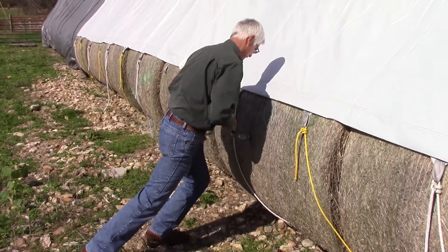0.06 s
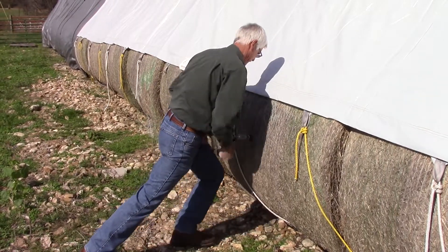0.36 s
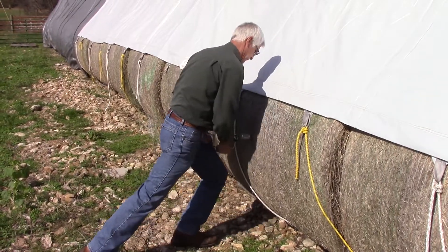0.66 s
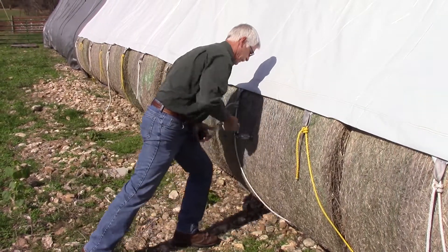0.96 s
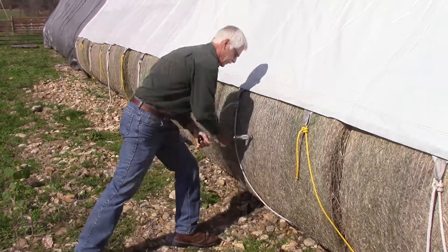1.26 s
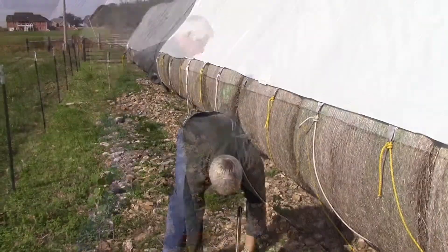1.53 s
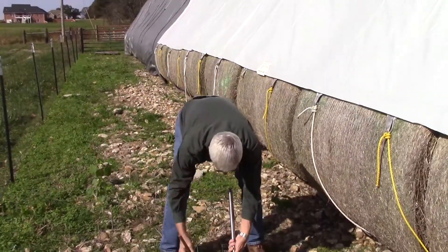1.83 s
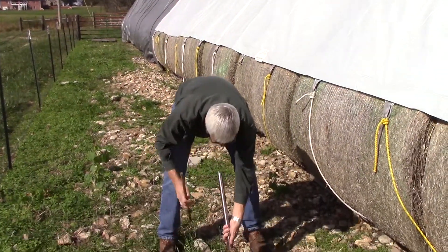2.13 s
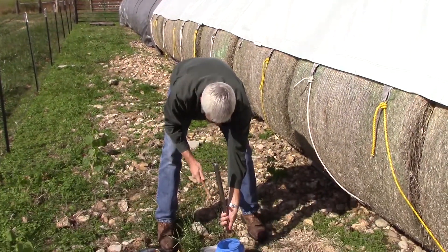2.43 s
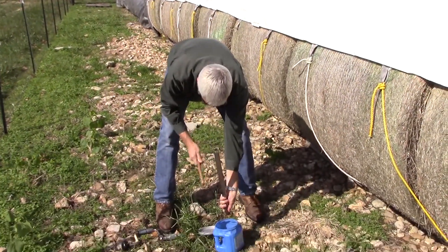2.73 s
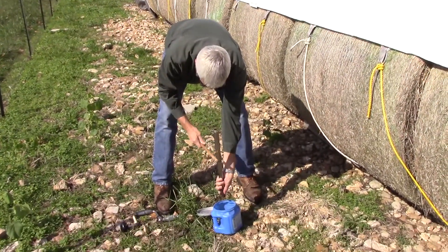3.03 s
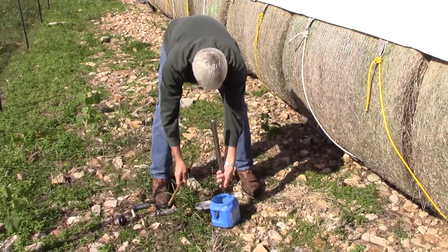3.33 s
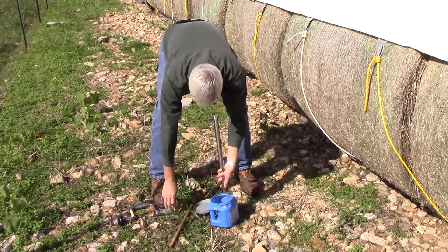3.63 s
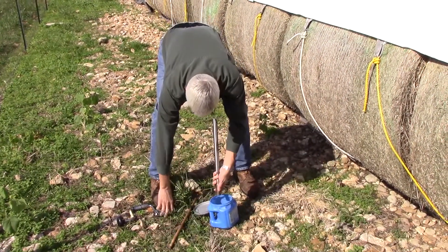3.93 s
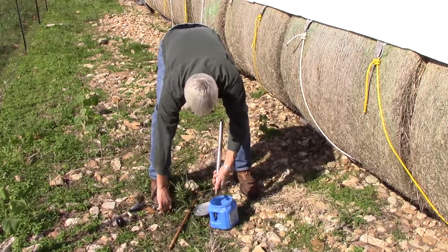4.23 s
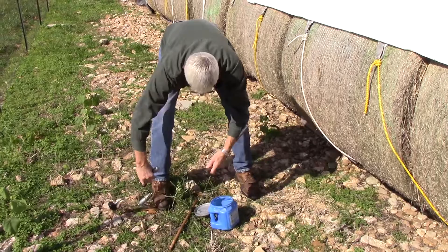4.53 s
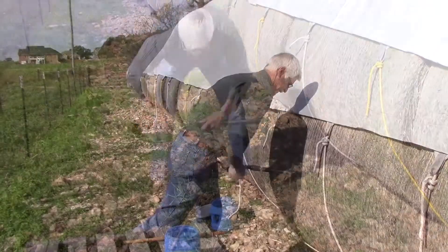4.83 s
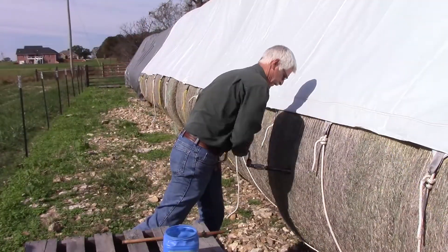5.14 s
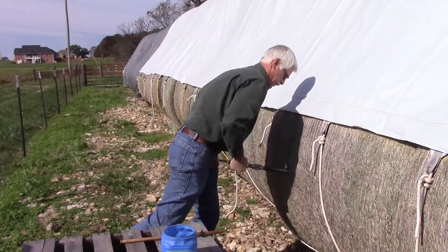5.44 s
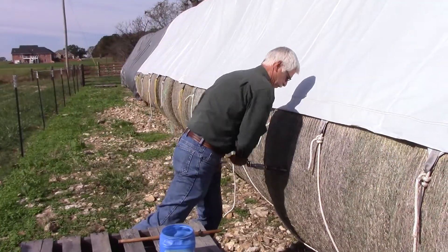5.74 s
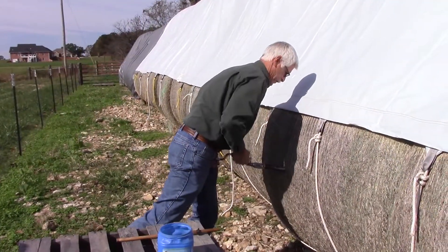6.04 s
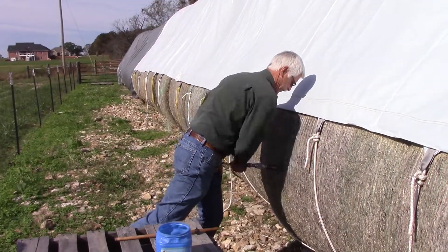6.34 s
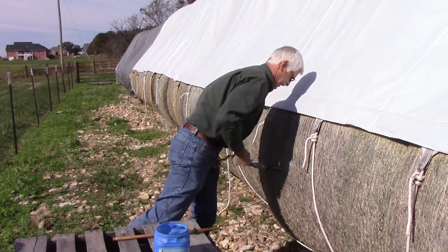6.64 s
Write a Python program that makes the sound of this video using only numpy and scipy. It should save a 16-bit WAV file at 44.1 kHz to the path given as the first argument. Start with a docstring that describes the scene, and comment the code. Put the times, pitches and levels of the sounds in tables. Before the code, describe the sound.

Crickets trill high and steadily in an open field over a soft, distant hum. Close to the microphone, a hand-cranked steel probe bores into a hay bale for the first second and a half: dry stalks scrape in uneven pushes, with brief squeaks, snaps and sharp knocks near 0.3 and 1.1 seconds. Two hollow bumps on a plastic jar follow around 1.5 seconds. Between 2.5 and 3 seconds, a rod taps four times in the tube, loud and sharp, leaving a short metallic ring. At about 3.6 seconds the rod drops on stony ground with a hard clank. From 4 to 4.7 seconds dry grass crackles, with soft thuds and light knocks. At 5 seconds the boring resumes in three scraping, squeaking pushes, with the sharpest squeak near 6.3 seconds, while one nearby cricket trills louder until the end.

```python
"""A hand-cranked steel probe bores into a hay bale, close to a stereo microphone in an open field.
Dry stalks scrape, squeak and snap on the turning tube, and the brace knocks. Four sharp taps of a rod
ram the core out and set the tube ringing; the rod drops on stony ground, and the boring resumes.
All round, ground crickets trill with their wings over a soft, distant hum; one is near the
microphone during the second boring."""
import sys
import numpy as np
from scipy import signal
from scipy.fft import rfft, irfft, next_fast_len
from scipy.io import wavfile
from scipy.ndimage import map_coordinates

SR = 44100
rng = np.random.default_rng(int(sys.argv[2]) if len(sys.argv) > 2 else 0)


def persist_wave(psi):
    """Save psi, clipped to +-1, as 16-bit WAV."""
    counts = np.round(np.clip(psi, -1, 1) * 32767).astype(np.int16)
    wavfile.write(sys.argv[1], SR, np.atleast_2d(counts).T)


N = 299439
TOP_HZ = 16000  # the recorder's band limit


def amp(db):
    """Decibels to gain."""
    return 10 ** (np.asarray(db) / 20)


def unit(x):
    """Scale to rms 1."""
    return x / np.sqrt(np.mean(x ** 2) + 1e-20)


def along(points, hz):
    """Interpolate (frequency [Hz], value) points on a log frequency axis."""
    freqs, values = np.transpose(points)
    return np.interp(np.log(hz + 1), np.log(freqs + 1), values)


def wobble(rate):
    """A smooth random curve with `rate` knots a second."""
    knots = rng.standard_normal(int(N * rate / SR) + 4)
    return map_coordinates(knots, [np.arange(N) * rate / SR])


def filtered(x, response):
    """Filter x by a gain given as a function of frequency."""
    size = next_fast_len(N + SR // 4)
    return irfft(rfft(x, size) * response(np.fft.rfftfreq(size, 1 / SR)), size)[..., :N]


def struck(force, colour_db):
    """A short force through a causal (minimum-phase) colour."""
    size = 8192
    cepstrum = irfft(np.log(amp(colour_db(np.fft.rfftfreq(size, 1 / SR)))))
    cepstrum[1:size // 2] *= 2
    cepstrum[size // 2 + 1:] = 0
    return irfft(rfft(force, size) * np.exp(rfft(cepstrum)))


def burst(t60):
    """Dying noise of energy 1."""
    t = np.arange(SR // 8) / SR
    noise = rng.standard_normal(len(t)) * np.exp(-np.log(1000) * t / t60)
    return noise / np.linalg.norm(noise)


def ring(hz, t60, phase=0):
    """One dying mode."""
    t = np.arange(SR // 2) / SR
    return np.sin(2 * np.pi * hz * t + phase) * np.exp(-np.log(1000) * t / t60)


def add(track, s, sound):
    """Mix a sound into a track at s seconds."""
    part = track[max(round(s * SR), 0):][:len(sound)]
    part += sound[:len(part)]


def rush(spectrum):
    """Steady noise of rms 1 with a fairly narrow stereo image."""
    # the open field at the microphone: (frequency [Hz], left-right correlation)
    likeness = [(100, .88), (500, .87), (2000, .82), (7500, .85), (14000, .9)]

    def mid_side_gains(hz):
        angle = np.arccos(along(likeness, hz)) / 2
        return amp(along(spectrum, hz)) * [np.cos(angle), np.sin(angle)]

    mid, side = filtered(rng.standard_normal((2, N)), mid_side_gains)
    return unit(np.array([mid + side, mid - side]))


def grains(spectrum, snaps_per_s, size_db, crackle_gain):
    """Tiny snaps of uneven size on a bed of rubbing noise, coloured, rms 1."""
    breaks = rng.random(N) < snaps_per_s / SR
    sizes = amp(size_db * np.minimum(rng.exponential(size=N), 4))
    crackle = unit(breaks * sizes * rng.standard_normal(N))
    rubbing = crackle_gain * crackle + rng.standard_normal(N)
    return unit(filtered(rubbing, lambda hz: amp(along(spectrum, hz))))


def crank_effort(release_s=0.062, drag_s=0.41):
    """Each push swells to its peak and lets go quickly; the tube drags on more quietly."""
    # pushes on the crank: (peak time [s], level [dB], swell [s], drag relative to the peak [dB])
    pushes = [(.04, -47.5, 0.12, -22), (.16, -50, 0.065, -20), (.52, -48.5, 0.21, -26),
              (0.759, -48, 0.043, -3), (1.0, -55.5, 0.13, -0.5), (1.33, -48, 0.13, -9),
              (1.55, -53.5, 0.094, -3), (5.039, -38.5, 0.1, -11), (5.682, -41, 0.085, -10),
              (6.34, -40, 0.09, -7.5)]
    t, power = np.arange(N) / SR, np.zeros(N)
    for s, db, swell, drag_db in pushes:
        before, after = np.maximum(s - t, 0), np.maximum(t - s, 0)
        fall = np.maximum(np.exp(-after / release_s), amp(drag_db) * np.exp(-after / drag_s))
        power += (amp(db) * np.exp(-before / swell) * fall) ** 2
    return np.sqrt(power)


def hay_scrape(clump_db=1, shift_db=3, bale_db=-5):
    """Stalks rub on the turning tube, whose resonances flare as the contact shifts; the bale grumbles."""
    # dry stalks on steel: (frequency [Hz], level [dB])
    spectrum = [(50, -29.5), (120, -2), (280, -6.5), (520, -1), (1200, -3.5), (3000, -5.5), (5000, -8.5),
                (6500, -2), (8500, -2), (12000, -10.5), (16000, -20)]
    # resonances of the tube: (frequency [Hz], width [Hz], boost [dB])
    resonances = [(1640, 197, 6.5), (2240, 180, 6), (2870, 250, 5.5), (3390, 230, 8), (4030, 240, 8.5),
                  (4570, 160, 8), (5480, 128, 5.5), (6030, 230, 5.5)]
    stalks = grains(spectrum, snaps_per_s=2007, size_db=3, crackle_gain=1)
    scrape = stalks
    for hz, width, db in resonances:
        mode = filtered(stalks, lambda f: 1j * f * width / (hz ** 2 - f ** 2 + 1j * f * width))
        scrape = scrape + (amp(db) - 1) * amp(shift_db * wobble(35)) * mode
    bale = rush([(80, -23.5), (170, 2), (330, -1.5), (550, -10), (1500, -39.5)])
    return crank_effort() * amp(clump_db * wobble(60)) * (unit(scrape) + amp(bale_db) * bale)


def outdoors(hum_db=-48.5, drift_db=0.6, hiss_db=-61):
    """A distant low hum that drifts a little, and a faint even hiss."""
    # the hum across the field: (frequency [Hz], level [dB])
    spectrum = [(20, -46), (45, -22), (62, -4), (95, 0.5), (130, -5.5), (215, -0.5), (330, -4.5), (560, -5),
                (640, -2.5), (1130, -4), (1400, -14), (2200, -16), (4000, -26), (6000, -40), (9000, -70)]
    hum = amp(hum_db + drift_db * wobble(2.94)) * rush(spectrum)
    hiss = rush([(1500, -2.5), (4000, -5.5), (6000, 1.5), (10000, 2), (12000, -10.5), (16000, -8.5)])
    return hum + amp(hiss_db) * hiss


def crickets(stroke_s=0.02226, vary_db=1, chorus_db=-51.5, waver_hz=70):
    """Each wing stroke is a short tone that arches and droops as the wing slows; far ones merge."""
    # single crickets, the nearest last:
    # (start [s], end [s], stroke rate [1/s], pitch [Hz], level [dB], timing scatter [s])
    singers = [(.058, 4.8, 15.72, 7850, -42.5, .003), (.023, 4.8, 30.74, 7330, -43.5, .003),
               (.03, 6.79, 19.72, 8600, -47.5, .002), (.04, 6.79, 14, 9500, -57, .012),
               (4.842, 6.79, 19.11, 7850, -33.5, .0004)]
    # the far chorus: (frequency [Hz], level [dB])
    chorus_band = [(5500, -31.5), (6500, -14.5), (7150, 3), (7900, 6.5), (8700, -4.5), (9600, -3.5),
                   (10400, -28.5), (12000, -35)]
    singles = np.zeros(N)
    progress = np.linspace(0, 1, int(stroke_s * SR))
    arch = 1 - .3 * (progress - .4) ** 2
    for start, end, rate, hz, db, scatter in singers:
        times = np.arange(start, end, 1 / rate)
        waver = np.pad(waver_hz * wobble(900), (0, len(progress)))
        for s, (late, sharp, soft) in zip(times, rng.standard_normal((len(times), 3))):
            pitch = hz * (arch + 0.0024 * sharp) + waver[int(s * SR):][:len(progress)]
            stroke = np.sin(np.pi * progress) * np.sin(2 * np.pi * np.cumsum(pitch) / SR)
            add(singles, s + scatter * late, amp(db - vary_db * soft) * stroke)
    chorus = amp(chorus_db + 1.9 * wobble(45)) * rush(chorus_band)
    return singles * amp([[.7], [-.7]]) + chorus  # single crickets sit a little to the left


def squeaks(rasp_db=3, overtone_db=-14):
    """Steel sticks and slips: brief gliding tones, unsteady in pitch and strength."""
    # slips of the probe: (time [s], level [dB], length [s], pitch [Hz], glide [octaves], waver [Hz])
    slips = [(.027, -30.5, 0.011, 7200, -.25, 300), (0.03, -34.5, 0.041, 5160, -0.065, 480),
             (.473, -42, .025, 5830, 0.06, 250), (0.706, -46, .04, 5370, -0.27, 350),
             (.745, -44, 0.028, 3000, -.15, 350), (1.162, -37, 0.086, 15500, 0, 130),
             (4.048, -39, .028, 14400, -0.17, 250), (5.047, -31.5, .021, 5940, -.086, 200),
             (5.6, -37.5, 0.052, 2730, 0, 90), (5.641, -39, 0.019, 3290, 0.2, 90),
             (5.679, -37.5, 0.0344, 2850, .38, 130), (6.178, -47, 0.043, 2780, 0.155, 90),
             (6.274, -40, 0.025, 2750, 0, 90), (6.349, -25.5, 0.0086, 4380, 0.17, 300),
             (6.352, -20, 0.018, 4770, 0.047, 100)]
    out = np.zeros(N)
    waver = wobble(900)
    for s, db, length, hz, glide, waver_hz in slips:
        progress = np.linspace(0, 1, int(length * SR))
        pitch = hz * 2 ** (glide * (progress - .5)) + waver_hz * waver[int(s * SR):][:len(progress)]
        phase = 2 * np.pi * np.cumsum(pitch) / SR
        overtone = amp(overtone_db) * (2 * hz < TOP_HZ) * np.sin(2 * phase)
        add(out, s, amp(db) * np.sin(np.pi * progress) ** 2 * (np.sin(phase) + overtone))
    return out * unit(amp(rasp_db * wobble(1200)))


def blow(rattle_db, t60, pitch_hz, peak_db, bass_db, treble_db, width=0.24, bass_hz=350, treble_hz=3800):
    """One sharp blow and a short rattle, with one broad resonance of its own."""
    # the colour common to knocks and snaps: (frequency [Hz], level [dB])
    spectrum = [(25, -44.5), (150, -11), (330, -1), (560, -10), (800, -1.5), (2300, -6), (4200, -13.5),
                (7200, -8.5), (10500, -22.5), (16000, -37)]
    force = amp(rattle_db) * burst(t60)
    force[0] += 1  # the blow, ahead of its rattle

    def colour_db(hz):
        detuning = 2 * (hz / pitch_hz - 1) / width
        peak = 10 * np.log10(1 + (amp(peak_db) ** 2 - 1) / (1 + detuning ** 2))
        bass = bass_db / (1 + (hz / bass_hz) ** 4)
        treble = treble_db * (1 - 1 / (1 + (hz / treble_hz) ** 6))
        return along(spectrum, hz) + peak + bass + treble

    return struck(force, colour_db)


def knocks():
    """Brace and rod knock on bale and ground, each contact with its own colour."""
    # contacts: (time [s], level [dB], rattle [dB], rattle t60 [s], pitch [Hz],
    # resonance [dB], bass [dB], treble [dB])
    contacts = [(0.3148, -5.5, 2.5, .042, 2000, 9.5, 17, -8), (0.3204, 11, -2.5, 0.02, 1060, 9, -8, 0),
                (.327, 0.5, 8, 0.049, 2050, 10.5, 7, -7), (1.137, 18, -12, 0.047, 2830, 11, -7.5, -12),
                (3.556, 16.5, 3.5, 0.037, 920, 5.5, -9.5, -4.5),
                (3.5776, 15, 5.5, 0.038, 3200, 8.5, -9.5, -0.5), (4.488, -2.5, 6, 0.13, 900, 10, 0, -11.5),
                (4.515, 2.5, 1.5, .06, 953, 7, 5, -10)]
    out = np.zeros(N)
    for s, db, *colour in contacts:
        add(out, s, amp(db) * blow(*colour))
    return out


def thuds(skew_rad=0.3):
    """Soft contacts give a few low cycles, a little out of step on the microphone's two sides."""
    # boots and hands: (time [s], level [dB], pitch [Hz], length [s])
    contacts = [(.331, -29.5, 170, 0.019), (.548, -38.5, 129, 0.019), (2.54, -36.5, 109, 0.02),
                (3.577, -30.5, 205, 0.016), (4.305, -32, 111, 0.017), (4.352, -32, 124, 0.039),
                (4.368, -28.5, 173, 0.014), (4.395, -35, 202, 0.011), (4.437, -36.5, 105, 0.017),
                (4.969, -38.5, 292, 0.028), (6.334, -40, 262, 0.031)]
    left, right = np.zeros((2, N))
    for s, db, hz, length in contacts:
        t = np.arange(int(length * SR)) / SR
        push = amp(db) * np.sin(np.pi * t / length)
        add(left, s, push * np.sin(2 * np.pi * hz * t + skew_rad))
        add(right, s, push * np.sin(2 * np.pi * hz * t - skew_rad))
    return np.array([left, right])


def stalk_snaps():
    """Dry stalks break with a brief bright crackle, each at its own pitch."""
    # breaking stalks: (time [s], level [dB], pitch [Hz])
    breaks = [(.365, -15.5, 2600), (.555, -12, 2300), (.761, -12.5, 9000), (.994, -12, 2600),
              (1.006, -20, 11000), (1.365, -15.5, 11500), (3.728, -9, 2300), (4.072, -15, 1420),
              (4.19, -11, 4000), (4.709, -13, 2400), (5.056, -12, 5900)]
    out = np.zeros(N)
    for s, db, hz in breaks:
        crackle = blow(rattle_db=3, t60=0.039, pitch_hz=hz, peak_db=8.5, bass_db=10, treble_db=5)
        add(out, s, amp(db) * crackle)
    return out


def jar_bumps():
    """A click on the wall of the plastic sample jar sets the air inside ringing."""
    # bumps on the jar: (time [s], level [dB], click relative to that level [dB])
    bumps = [(1.4806, -21.5, 17), (1.6268, -33.5, 23)]
    # the air in the jar: (frequency [Hz], level [dB], t60 [s])
    modes = [(227.5, -16, 0.26), (421, 0.5, 0.12), (988, -15, 0.077)]
    click_colour = [(30, -41), (120, -30), (1000, 9.5), (3000, -8.5), (15000, -22)]
    click = struck([1], lambda hz: along(click_colour, hz))
    hollow = sum(amp(db) * ring(hz, t60) for hz, db, t60 in modes)
    out = np.zeros(N)
    for s, db, click_db in bumps:
        add(out, s, amp(db) * hollow)
        add(out, s, amp(db + click_db) * click)
    return out


def clang(modes, vary_db, attack_s):
    """Steel modes swell during the contact, at new strengths and phases for each blow."""
    t = np.arange(SR // 2) / SR
    offsets_db = vary_db * rng.standard_normal(len(modes))
    phases = rng.uniform(0, 2 * np.pi, len(modes))
    ringing = sum(amp(db + offset) * ring(hz, t60, phase)
                  for (hz, db, t60), offset, phase in zip(modes, offsets_db, phases))
    return ringing * (1 - np.exp(-t / attack_s))


def rod_taps(clatter_t60=0.028, clatter_boost_db=26.5):
    """The rod clatters in the tube, which rings as freely as the grip allows until the rod chokes it."""
    # rod strikes: (time [s], level [dB], steel ring [dB], clatter before boost [dB], free ringing [s])
    strikes = [(2.514, -4, 7.5, -10, 0.089), (2.674, 1, -3.5, -12.5, 0.12),
               (2.8348, 0.5, -3.5, -9.5, 0.097), (2.9832, -1, -7, -6.5, 0.35),
               (3.0128, -14.5, -15, -20, .2)]
    # the tube with the rod in it: (frequency [Hz], level [dB], t60 [s])
    tube = [(720, -22.5, .1), (1526, -34.5, 0.014), (1962, -3.5, 0.045), (2061, -0.5, .024),
            (2310, -21.5, 0.0071), (2897, -13.5, 0.031), (3520, -14, 0.022), (4430, -18.5, 0.14),
            (4423, -46, 0.67), (4432, -53, 0.64), (4600, -25, 0.1), (4940, -14.5, 0.046),
            (5500, -9.5, 0.028), (5570, -59, .5), (5900, -23, .025), (7400, -14.5, 0.033),
            (8350, -24.5, 0.051), (12450, -31.5, 0.072)]
    clatter_colour = [(100, -25), (1000, -15.5), (1600, 3.5), (3000, 6), (4000, -3), (6500, 0.5),
                      (9000, -17), (16000, -30)]
    out, t = np.zeros(N), np.arange(SR // 2) / SR
    for s, db, ring_db, clatter_db, free_s in strikes:
        # the steel ring is carried by the short-lived modes near 4.5 kHz
        modes = [(hz, level + ring_db * (4000 < hz < 4800 and t60 < .3), t60) for hz, level, t60 in tube]
        choke = 1 / (1 + (t / free_s) ** 8)
        add(out, s, amp(db) * clang(modes, vary_db=1, attack_s=0.001024) * choke)
        clatter = struck(burst(clatter_t60), lambda hz: along(clatter_colour, hz))
        add(out, s, amp(db + clatter_db + clatter_boost_db) * clatter)
    return out


def dropped_rod():
    """Each end of the rod hits a stone and rings."""
    # one end lands, then the other: (time [s], level [dB])
    landings = [(3.557, -15.5), (3.579, 1.5)]
    # the bare rod: (frequency [Hz], level [dB], t60 [s])
    modes = [(213, -28.5, 0.035), (413, -18.5, 0.052), (1295, -15, 0.023), (2126, 0, 0.017),
             (2460, -5, 0.016), (3015, -11.5, 0.044), (3075, -53, 0.57), (4160, -20.5, 0.034)]
    out = np.zeros(N)
    for s, db in landings:
        add(out, s, amp(db) * clang(modes, vary_db=4, attack_s=0.0006))
    return out


def dry_grass(clump_db=3):
    """Dry grass crackles as the tools are gathered; each grab swells and fades evenly."""
    # a hand in grass and stones: (peak time [s], level [dB], half-width [s])
    grabs = [(4.12, -51.5, 0.098), (4.19, -41.5, 0.015), (4.277, -54, 0.056), (4.34, -40.5, 0.014),
             (4.394, -46, 0.028), (4.51, -54, 0.076)]
    colour = [(100, -14), (500, -4.0), (2500, 4), (6000, 0.5), (9000, -1.5), (16000, -15)]
    t = np.arange(N) / SR
    touch = sum(amp(db) * np.exp(-((t - s) / half_width) ** 2) for s, db, half_width in grabs)
    clumps = amp(clump_db * wobble(70))
    return touch * clumps * grains(colour, snaps_per_s=1000, size_db=3.5, crackle_gain=0.91)


def reflections(x, t60=0.12):
    """Bales and ground scatter a short answer, different on each side of the microphone."""
    return np.array([signal.fftconvolve(x, burst(t60))[:N] for _ in range(2)])


def scene():
    """The work close in front of the microphone, the field all round."""
    blows = rod_taps() + dropped_rod() + knocks() + stalk_snaps() + jar_bumps()
    field = hay_scrape() + dry_grass() + squeaks() + thuds() + outdoors()
    lean_left = amp([[.45], [-.45]])
    return blows + amp(-26) * reflections(blows) + field * lean_left + crickets()


def record(dry):
    """The loudest taps overload the recorder, which keeps nothing above its band limit."""
    return filtered(np.clip(dry, -1, 1), lambda hz: 1 / np.sqrt(1 + (hz / TOP_HZ) ** 120))


dry = scene()
out = record(dry)
persist_wave(out)
```